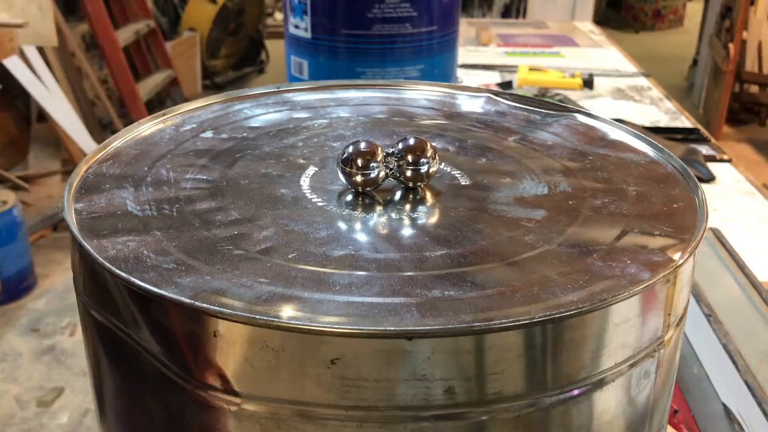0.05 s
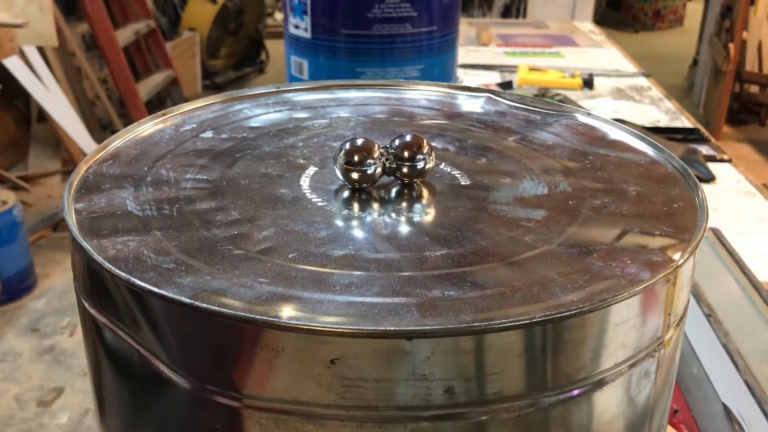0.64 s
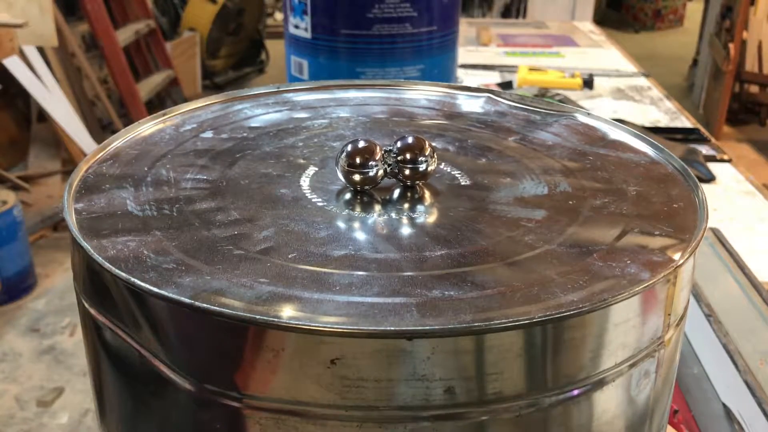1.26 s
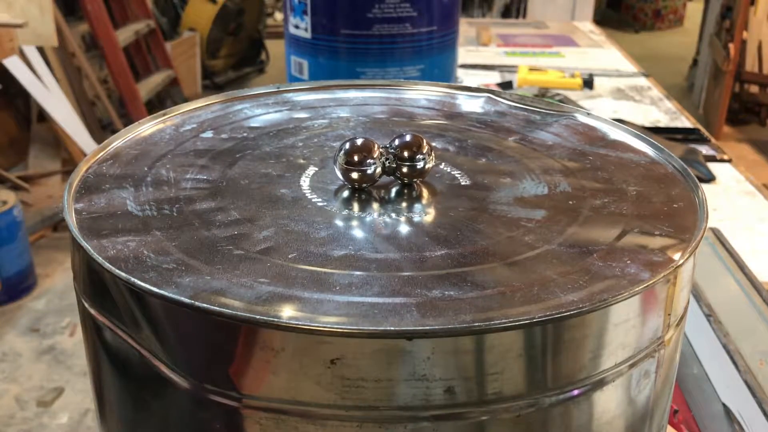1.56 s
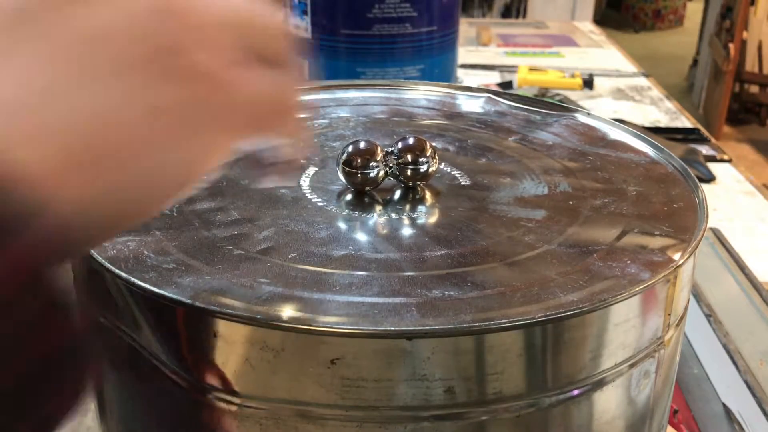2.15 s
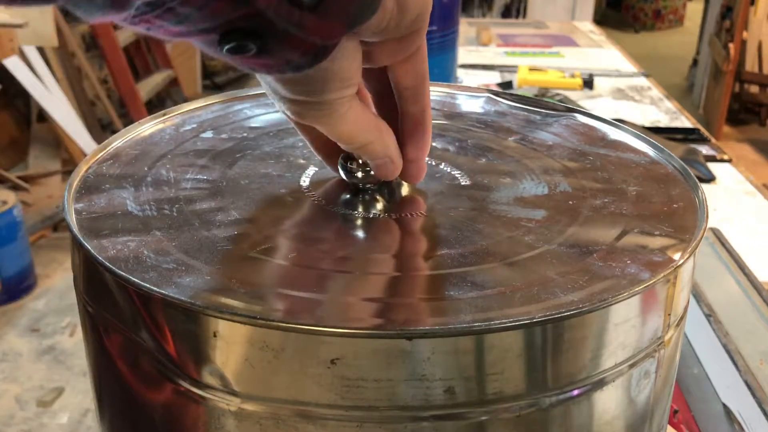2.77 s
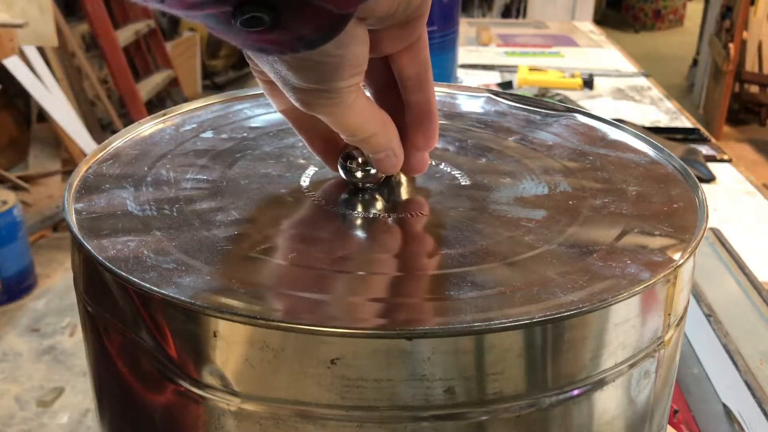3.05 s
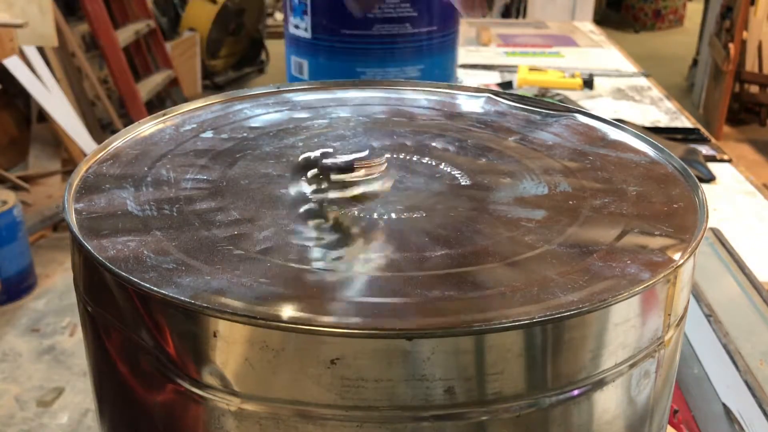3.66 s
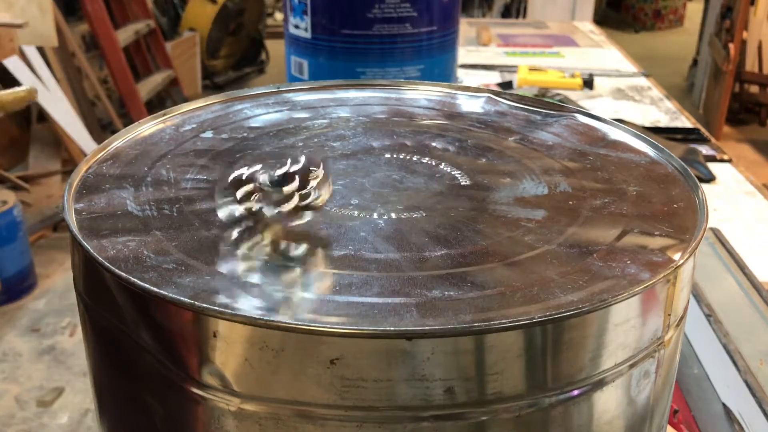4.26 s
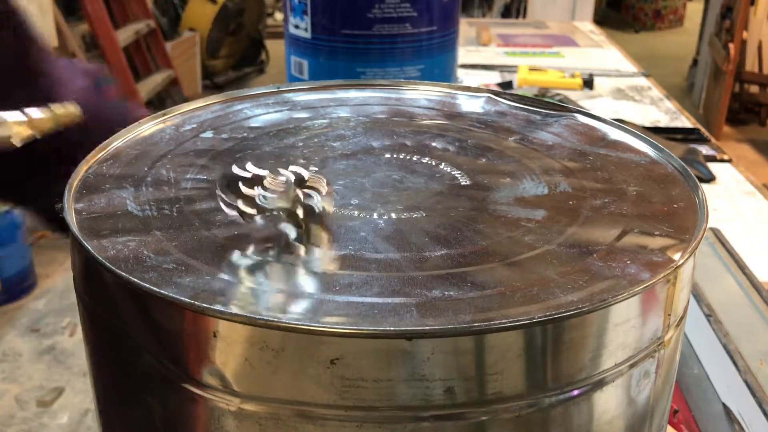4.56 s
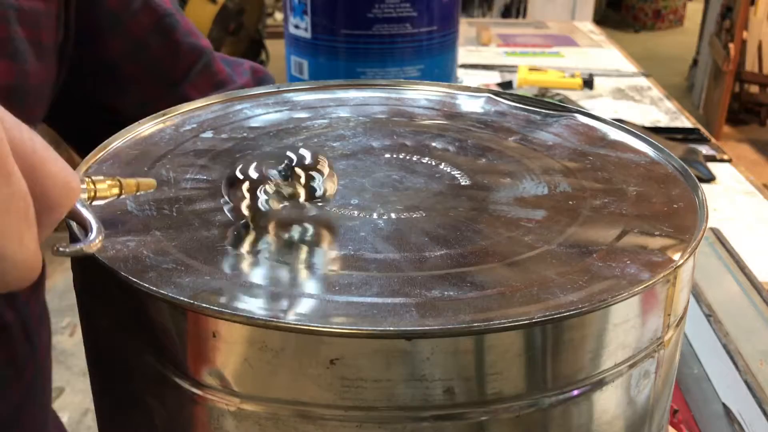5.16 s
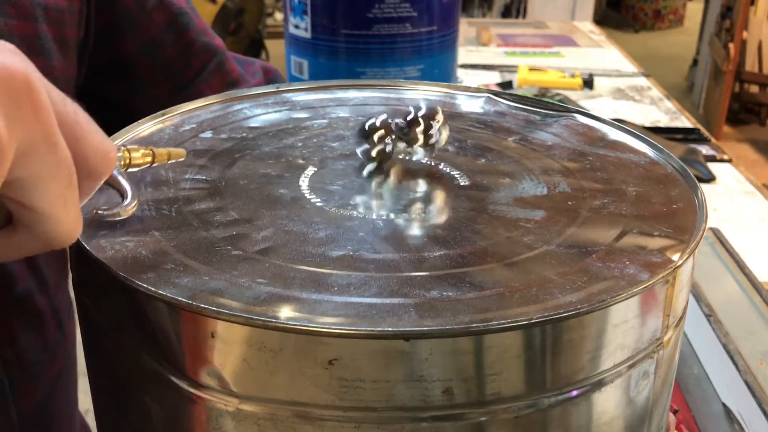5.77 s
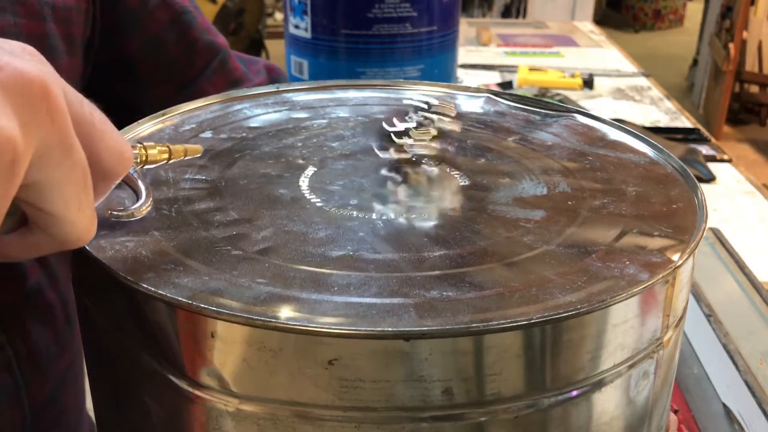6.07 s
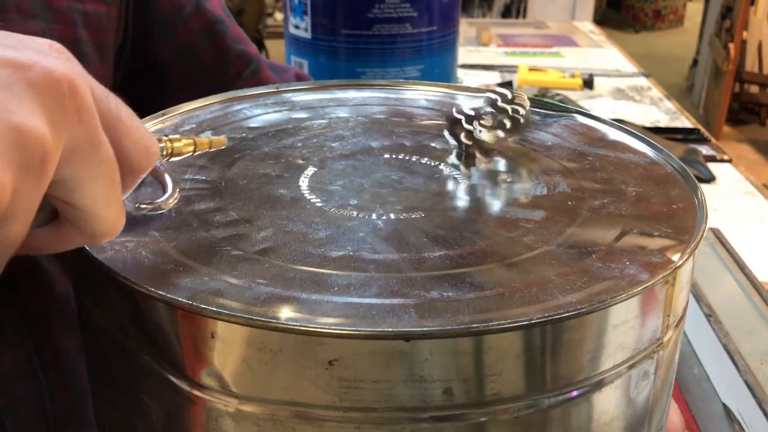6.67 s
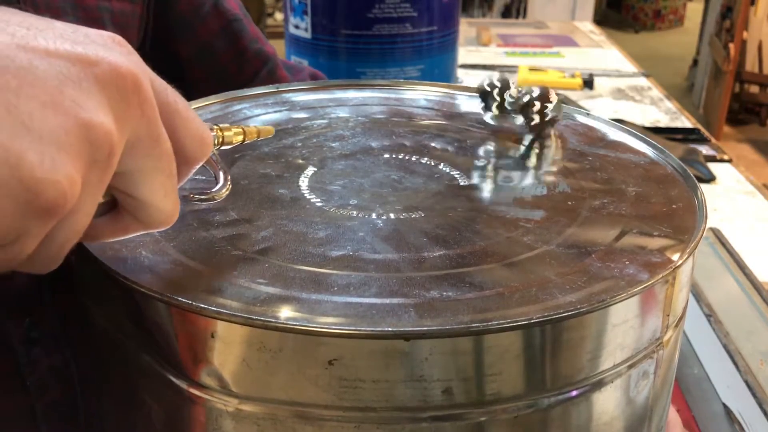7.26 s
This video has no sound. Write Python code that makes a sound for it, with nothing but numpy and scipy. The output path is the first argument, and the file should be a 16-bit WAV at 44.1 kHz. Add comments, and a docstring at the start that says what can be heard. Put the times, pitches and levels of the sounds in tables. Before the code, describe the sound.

For the first two seconds there is only low workshop room noise with a few small clicks, heard from just above a large metal tin. A light knock comes at about 2.1 seconds, then a faint sleeve rustle, a click and soft rubbing as fingers roll two joined steel balls on the lid. At 3.6 seconds the balls are flicked into a spin: a few clacks, a short rising, ringing skid, then a continuous metallic rattle over the lid's hum, swelling in buzzing bursts as they bounce. At 5.1 seconds an air gun opens with a loud roar that sinks in pitch and gives way within half a second to a steady, bright hiss. The balls keep rattling beneath it, with several hard landings between 5.5 and 6.3 seconds. The hiss grows slightly shriller, and both sounds continue until the end at about 7.5 seconds.

```python
"""A workshop, the microphone just above the lid of a large tin. Fingers roll two joined steel ball
bearings into place, then flick them into a spin. Their rolling contact rattles the lid, and they
bounce on it in bursts, with some hard landings. An air gun opens, roars over the balls and drives
them towards the rim, hissing steadily. Behind it all, the tin sings faintly with the room's noise."""
import sys
import numpy as np
from scipy import signal
from scipy.fft import rfft, irfft
from scipy.io import wavfile
from scipy.ndimage import uniform_filter1d

SR = 44100
rng = np.random.default_rng(int(sys.argv[2]) if len(sys.argv) > 2 else 0)


def pcm_store(signal):
    """Save signal as 16-bit PCM."""
    levels = np.round(np.clip(np.atleast_2d(signal), -1, 1) * 32767)
    wavfile.write(sys.argv[1], SR, levels.astype(np.int16).T)


N = 331632
TIME = np.arange(N) / SR
FLICK_S, SHOP_T60_S = 3.648, 0.41


# The balls' path under the microphone. Each row: time in seconds, place from 0 (middle) to 1 (rim).
BALL_PATH = [(3.6, 0.43), (5.2, 0), (5.6, 0.6), (6.3, 0.7), (7.0, 0.75), (7.5, 0.96)]
# The pair skids, settles and spins freely. Each row: time in seconds, rattle in dB, rumble in dB.
FREE_SPIN = [(3.66, -36.5, -22.5), (3.71, -30.5, -22.5), (3.745, -24, -25.5), (3.82, -22, -23),
             (3.97, -31, -28), (4.16, -32.5, -27), (4.28, -29.5, -22.5), (4.49, -32.5, -31.5),
             (4.84, -29.5, -27.5), (5.02, -31.5, -27)]
# The air holds the pair back, then drives it outwards. Each row reads as in the free spin.
DRIVEN_SPIN = [(5.11, -35.5, -33.5), (5.35, -32.5, -31.5), (5.39, -28.5, -22), (5.52, -26, -17),
               (5.77, -28, -22), (6.2, -25, -23), (6.44, -31, -28), (7.06, -31, -27), (7.16, -31, -23),
               (7.5, -33, -26)]
# The lid's low and middle modes from close above. Each row: pitch in Hz, width in Hz, weight in dB
# with the balls near the middle, weight in dB near the rim.
LOW_MODES = [(158.6, 25, -6.5, 8.5), (191.4, 15, 1, -9), (222.6, 19, 3, -4), (243.2, 16.6, 3, 0.5),
             (280.7, 24, -14.5, 3), (301, 8.3, -4.5, -1.5), (328, 13, -16, 1), (346, 7, -7, 1.5),
             (419.6, 14, -17.5, -1.5)]
MID_MODES = [(478, 14, -0.5, -2.5), (535.6, 16.6, 2.5, 4), (553.7, 17, 2.5, -5.5), (583, 16, -6, -21),
             (630, 16, 1, -20), (658, 11, -7, -9), (771.5, 17, -13, -7), (836, 12, 0.5, -6.5),
             (858, 19, 1, -9), (970, 140, -26, -22)]
def spinning_balls():
    """Dense micro-impacts of steel on sheet metal, bunched at each bounce, make the lid rumble and ring."""
    rattle_db, rumble_db = in_time(FREE_SPIN + DRIVEN_SPIN)
    place, = in_time(BALL_PATH)
    swell, phase = bouncing()
    burst = swell / swell.max()
    drum = swell * np.sqrt(2) * np.cos(phase)
    # the contact presses harder once a bounce, the more so in a strong burst
    pressure = np.clip(1 + (0.097 + .5 * burst) * np.cos(phase), 0, None) * from_db(1.23 * drift(60))
    force = rms_one(grains(per_s=6000, spread_db=2.5) * pressure)
    rumble = from_db(rumble_db + 6 * burst) * radiated(lid(force, LOW_MODES, place))
    ring_db = -32 + 1.32 * (rattle_db + 30.5)   # follows the rattle, which is -30.5 dB at an even spin
    ring = from_db(ring_db) * radiated(lid(force, MID_MODES, place))
    contact = rattle(force, rattle_db, burst) + skid()
    hum = from_db(rumble_db) * whirl(place)
    return (drum + rumble + ring + contact + hum) * after(FLICK_S)


def lid(force, modes, place):
    """The lid's modes, weighted by where the balls run and held at an even level."""
    out = sum(from_db(middle_db + (rim_db - middle_db) * place) * resonate(force, hz, width)
              for hz, width, middle_db, rim_db in modes)
    return out / np.sqrt(uniform_filter1d(out ** 2, size=2600).clip(0) + 1e-12)


# Trains of bouncing on the lid. Each row: first and last burst in seconds, number of bursts,
# bounces per second, first level in dB, change per burst in dB.
BOUNCE_TRAINS = [(3.672, 3.735, 2, 118, -27.5, 1.5), (3.835, 4.098, 3, 111, -26, 0.2),
                 (4.289, 4.355, 2, 116, -28, -4), (4.543, 4.637, 2, 112, -26.5, 4.5),
                 (4.732, 5.081, 5, 111, -23, -1.5), (5.408, 5.718, 5, 113, -28, 1.15),
                 (5.823, 6.217, 5, 112, -30.5, 1.56), (6.314, 6.614, 4, 103.4, -21.5, -2.8),
                 (6.72, 7.423, 8, 107, -29.5, -0.8)]
def bouncing(half_length_s=0.023, wander=0.029):
    """Swell and phase of the bounce bursts, evenly spaced in trains that grow or die step by step."""
    bursts = [(at, per_s, first_db + k * step_db)
              for first_s, last_s, count, per_s, first_db, step_db in BOUNCE_TRAINS
              for k, at in enumerate(np.linspace(first_s, last_s, round(count)))]
    swell = swells([(at, half_length_s, db) for at, _, db in bursts])
    rate, _ = in_time(bursts)
    return swell, 2 * np.pi * np.cumsum(rate * (1 + wander * drift(90))) / SR


# High lid modes that stand out of the rattle. Each row: pitch in Hz, width in Hz, relative level in dB.
HIGH_MODES = [(1185, 10, -13), (1424, 44, -17.5), (1660, 26, -18.5), (2106, 20, -18), (2280, 19, -34),
              (2440, 16, -27), (2580, 18, -17), (2770, 13, -18), (3140, 28, -43), (3570, 63, -25)]
# The contact's rattle and sizzle, close up. Each row: frequency in Hz, relative level in dB.
RATTLE_SPECTRUM = [(700, -15), (1000, -6.5), (1400, 1), (2400, -1.5), (3400, -4), (4400, -4.5), (5900, -5),
                   (7200, -16.5), (9500, -51)]
SIZZLE_SPECTRUM = [(5000, -21), (7200, 2), (8800, 4.5), (10500, -3), (12000, 0.5), (15700, -1.5)]
def rattle(force, level_db, burst):
    """The contact shakes the high modes, sizzling more in bursts and while the steel slips at first."""
    sheet = rms_one(force + shimmer(force, decay_s=0.0055) + tail(force, t60=0.2))
    tones = sum(from_db(db) * rms_one(resonate(force, hz, width)) for hz, width, db in HIGH_MODES)
    slip = np.exp(-np.maximum(TIME - FLICK_S, 0) / 0.11)
    sizzle_db = -13 + 8.5 * slip + 3.5 * burst + 4.5 * drift(45)
    sizzle = from_db(sizzle_db) * coloured(sheet, SIZZLE_SPECTRUM)
    return from_db(level_db) * (coloured(sheet, RATTLE_SPECTRUM) + tones + sizzle)


def shimmer(force, decay_s):
    """Each impact leaves a brief wash of overlapping high modes, different at every spot on the lid."""
    r = np.exp(-1 / (decay_s * SR))
    energy = signal.lfilter([1 - r], [1, -r], force ** 2 + 1e-18)
    return rms_one(rng.standard_normal(N) * np.sqrt(energy))


# Steel skidding on the lid. Each row: time in seconds, level in dB, pitch in Hz.
SKID_RING = [(3.64, -120, 332), (3.66, -37, 341), (3.74, -21, 398.6), (3.775, -25, 501), (3.80, -23, 611),
             (3.83, -12.5, 633), (3.88, -29.5, 643), (3.96, -24, 650), (4.05, -120, 645)]
def skid():
    """Just after the flick the balls skid with a rising ring."""
    db, hz = in_time(SKID_RING)
    return from_db(db) * wavering(hz, rate=110)


# The pair's speed on the lid. Each row: time in seconds, turns per second.
SPIN_SPEED = [(3.65, 60), (4.85, 59.3), (5.5, 51), (5.85, 57.4), (6.3, 55.2), (7.5, 53)]
# The spin's third and fourth multiples. Each row: dB against the rumble near the middle, then at the rim.
WHIRL_HUM = [(-10, -2), (-8.5, 1)]
def whirl(place):
    """The whirling pair rocks the lid; multiples of its spin that meet lid modes hum, most at the rim."""
    turns_per_s, = in_time(SPIN_SPEED)
    angle = 2 * np.pi * np.cumsum(turns_per_s * (1 + 0.01484 * drift(30))) / SR
    hum = np.zeros(N)
    for multiple, (middle_db, rim_db) in zip((3, 4), WHIRL_HUM):
        db = middle_db + (rim_db - middle_db) * place ** 2.76 + 1.94 * drift(25)
        hum += from_db(db) * np.sin(multiple * angle)
    return np.sqrt(2) * hum


# Hard landings right under the microphone. Each row: start in seconds, relative strength in dB.
LANDINGS = [(3.657, -6.5), (3.738, -7), (3.824, -10), (4.276, -17), (4.825, -16.5), (5.480, -8),
            (5.533, -2.5), (5.606, -11), (5.630, -11), (5.668, -20), (5.820, -16.5), (5.890, -4),
            (6.071, -4), (6.103, -18), (6.161, -1), (6.203, -9), (6.336, -16)]
def landings():
    """A ball drops hard: the lid thumps in its modes, damped by the ball, with a short clack on top."""
    hits = clicks(LANDINGS)
    thump = sum(from_db(rim_db) * resonate(hits, hz, 1.6 * width)
                for hz, width, _, rim_db in LOW_MODES + MID_MODES)
    clack = band(tail(hits, t60=0.071), 700, 8800)
    return from_db(23) * radiated(thump) + from_db(10) * clack


# The jet, close by; its shrill band grows as the nozzle turns towards the microphone.
# Each row: time in seconds, hiss in dB, shrill band in dB.
JET_LEVELS = [(5.1, -26, -60), (5.15, -24.5, -33), (5.18, -16, -26), (5.31, -13, -31), (5.42, -16, -30),
              (5.8, -16.5, -34), (6.4, -16.5, -27.5), (6.9, -15, -26.5), (7.52, -16, -21.5)]
# The nozzle's hiss. Each row: frequency in Hz, relative level in dB.
HISS_SPECTRUM = [(400, -8), (1200, -5.5), (2600, -8.5), (3300, -9), (4000, -3.5), (6300, -2), (8800, -2),
                 (10200, -3.5), (11600, -4), (13000, -6.5), (14400, 1), (15600, 1)]
# The half-open valve's resonances. Each row: pitch in Hz, width in Hz.
VALVE_MODES = [(10900, 1050), (14200, 490), (14900, 610)]
def air_gun(opens_s=5.097, hold_s=0.09, fade_db_per_s=600):
    """The valve cracks open with a brief sizzle, the nozzle hisses and the stream roars."""
    hiss_db, shrill_db = in_time(JET_LEVELS)
    hiss = from_db(hiss_db + .5 * drift(50)) * coloured(rng.standard_normal(N), HISS_SPECTRUM)
    shrill = from_db(shrill_db) * rms_one(band(rng.standard_normal(N), 11000, 14200, order=4))
    valve_db = -33 - fade_db_per_s * np.maximum(TIME - opens_s - hold_s, 0)
    leak = sum(resonate(resonate(rng.standard_normal(N), hz, width), hz, 2 * width)
               for hz, width in VALVE_MODES)
    return (hiss + shrill + from_db(valve_db) * rms_one(leak) + air_roar()) * after(opens_s)


# The stream breaking over the balls, below the microphone. Each row: time in seconds, level in dB.
ROAR_LEVELS = [(5.13, -48), (5.18, -15), (5.3, -12.5), (5.44, -17), (5.55, -24), (5.72, -38), (6.2, -37),
               (6.45, -36), (7.52, -28)]
def air_roar(near_hz=2500, far_hz=1100, blown_away_s=5.33, sink_s=0.17):
    """Eddies roar, sinking in pitch as the balls are blown away; spilled air buffets the microphone."""
    roar_db, = in_time(ROAR_LEVELS)
    centre_hz = far_hz + (near_hz - far_hz) * np.exp(-np.maximum(TIME - blown_away_s, 0) / sink_s)
    eddies = rng.standard_normal(N)
    eddies += from_db(-14.5) * tail(eddies, t60=0.11)   # the lid throws the roar back
    edges_hz = np.geomspace(400, 14000, num=13)
    roar, power = 0, 0
    for low, high in zip(edges_hz, edges_hz[1:]):
        octaves = np.log2(np.sqrt(low * high) / centre_hz)
        slope_db = np.minimum(16 * (octaves + 0.43), -2.7 * np.maximum(octaves, 0))
        gain = from_db(slope_db + 2.4 * drift(70))
        roar += gain * rms_one(band(eddies, low, high, order=3))
        power += gain ** 2
    draught = from_db(0.42 * roar_db - 40) * rms_one(band(rng.standard_normal(N), 25, 100))
    return from_db(roar_db) * rms_one(roar / np.sqrt(power)) + draught


# Passes of the hand near the microphone. Each row: peak in seconds, half length in seconds, level in dB.
BRUSHES = [(.25, 0.12, -68.5), (.52, .09, -68.5), (2.3, 0.12, -61), (2.53, 0.052, -59.5),
           (2.71, 0.043, -53), (2.8, 0.075, -64), (3.65, .014, -41.5)]
# The cloth's rustle. Each row: frequency in Hz, relative level in dB.
SLEEVE_SPECTRUM = [(200, 5), (700, 3), (1500, -1.5), (3500, -8), (6000, -11.5), (10000, -16), (15500, -18)]
def sleeve():
    """Sleeve and fingers brush past, the last time in the flick."""
    return swells(BRUSHES) * coloured(grains(per_s=4300, spread_db=0.5), SLEEVE_SPECTRUM)


# The pressed lid and the fingertips, faint even this close.
# Each row: time in seconds, level in dB, pitch in Hz.
PRESSED_LID = [(2.44, -90, 255), (2.48, -59, 263), (2.51, -49, 264), (2.6, -53, 279), (2.67, -51, 303.5),
               (2.73, -49, 310), (2.79, -53, 293), (2.86, -60, 285), (2.95, -90, 280)]
FINGER_SQUEAK = [(2.48, -90, 1450), (2.52, -67, 1524), (2.6, -65.5, 1495), (2.66, -65, 1760),
                 (2.72, -70, 1640), (2.8, -90, 1605)]
def rubbing():
    """The pressed lid hums under the slowly rolled balls, and fingertips squeak on the steel."""
    lid_db, lid_hz = in_time(PRESSED_LID)
    squeak_db, squeak_hz = in_time(FINGER_SQUEAK)
    hum = from_db(lid_db) * wavering(lid_hz, rate=95)
    return hum + from_db(squeak_db) * wavering(squeak_hz, rate=240)


# Handling at the tin. Each row: start in seconds, peak in dB, lowest and highest frequency in Hz,
# room tail in dB against the tap.
TAPS = [(.189, -50, 200, 900, -8), (.218, -51, 1800, 5000, 3), (.270, -56, 1500, 5000, -4),
        (.303, -46, 7000, 15000, -3), (.524, -36.5, 2500, 15000, -3), (.549, -48, 1510, 6100, -4),
        (2.148, -33, 240, 1450, 2.5), (2.162, -47, 300, 1600, -10), (2.685, -33, 1600, 7000, -16)]
def taps():
    """Small knocks and clicks, each with its echo in the workshop."""
    direct, to_room = np.zeros((2, N))
    for s, db, low_hz, high_hz, tail_db in TAPS:
        tap = band(clicks([(s, 0)]), low_hz, high_hz, order=4)
        tap *= from_db(db) / np.abs(tap).max()
        direct += tap
        to_room += from_db(tail_db) * tap
    return direct + tail(to_room, SHOP_T60_S)


# The workshop all around. Each row: frequency in Hz, relative level in dB.
ROOM_SPECTRUM = [(20, -22), (45, -0.5), (70, 2.5), (105, 2.5), (150, -5), (200, -3.5), (260, -9),
                 (360, -10.5), (480, -13.5), (650, -24), (850, -21), (2000, -29), (4000, -34),
                 (15500, -37.5)]
# The tin's own hum from just above. Each row: pitch in Hz, width in Hz, level in dB.
TIN_HUM = [(244.4, 8.4, -66.5), (360, 24, -76.5), (640, 28, -74.5)]
def room_tone():
    """The room's steady noise, with the tin singing faintly along."""
    room = from_db(-57.5) * coloured(rng.standard_normal(N), ROOM_SPECTRUM)
    return room + sum(from_db(db) * rms_one(resonate(rng.standard_normal(N), hz, width))
                      for hz, width, db in TIN_HUM)


def from_db(db):
    """Decibels to gain."""
    return 10 ** (np.asarray(db) / 20)


def rms_one(x):
    """Scale to rms 1."""
    return x / np.sqrt(np.mean(x ** 2) + 1e-20)


def in_time(rows):
    """Each column of a curve at every sample."""
    s, *columns = np.transpose(rows)
    return [np.interp(TIME, s, c) for c in columns]


def after(start_s):
    """A gain that opens within 5 ms."""
    return np.clip((TIME - start_s) * 200, 0, 1)


def swells(rows):
    """Smooth rises and falls, one for each (s, half length s, dB), as a gain."""
    t = TIME[::40]
    power = sum(from_db(db) ** 2 * np.exp(-((t - at) / half_s) ** 2) for at, half_s, db in rows)
    return np.interp(TIME, t, np.sqrt(power + 1e-18))


def drift(rate):
    """A random wander through `rate` values a second, each of spread 1."""
    knots = rng.standard_normal(8000)
    return np.interp(TIME * rate, np.arange(len(knots)), knots)


def wavering(hz, rate):
    """A rubbed tone whose strength and phase wander `rate` times a second."""
    phase = 2 * np.pi * np.cumsum(hz) / SR
    return drift(rate) * np.cos(phase) + drift(rate) * np.sin(phase)


def clicks(rows):
    """One click for each (s, dB)."""
    out = np.zeros(N)
    for s, db in rows:
        out[round(s * SR)] += from_db(db)
    return out


def grains(per_s, spread_db):
    """Random tiny impacts of uneven size; rms 1."""
    sizes = from_db(spread_db * np.minimum(rng.exponential(1, N), 4)) * rng.choice([-1, 1], N)
    return rms_one(sizes * (rng.random(N) < per_s / SR))


def coloured(x, spectrum):
    """Give a steady sound a spectrum; rms 1."""
    hz, db = np.transpose(spectrum)
    bins = np.fft.rfftfreq(N, 1 / SR) + 1
    low_cut = np.minimum(bins / hz[0], 1) ** 2
    gain = from_db(np.interp(np.log(bins), np.log(hz), db))
    return rms_one(irfft(rfft(x) * low_cut * gain, N))


def band(x, low_hz, high_hz, order=2):
    """Causal band-pass."""
    sos = signal.butter(order, [low_hz, min(high_hz, SR / 2 - 1000)], "band", fs=SR, output="sos")
    return signal.sosfilt(sos, x + 1e-18)


def resonate(x, hz, width_hz):
    """One resonance with gain 1 at its peak."""
    r = np.exp(-np.pi * width_hz / SR)
    feedback = [1, -2 * r * np.cos(2 * np.pi * hz / SR), r * r]
    return signal.lfilter(np.array([1, 0, -1]) * (1 - r * r) / 2, feedback, x + 1e-18)


def radiated(x, lowest_hz=105):
    """The lid gives off next to nothing below its lowest mode."""
    return signal.sosfilt(signal.butter(4, lowest_hz, "high", fs=SR, output="sos"), x)


def tail(x, t60):
    """Countless overlapping modes or echoes: a dying noise as response, at unit energy."""
    t = TIME[:SR // 2]
    response = rng.standard_normal(len(t)) * from_db(-60 * t / t60)
    return signal.fftconvolve(x, response / np.linalg.norm(response))[:N]


def scene():
    """Everything is heard from one spot just above the tin, the same in both ears."""
    near = spinning_balls() + landings() + air_gun()
    echo = from_db(-15.5) * tail(band(near, 330, 11000, order=1), SHOP_T60_S)
    return np.tile(near + echo + room_tone() + sleeve() + rubbing() + taps(), (2, 1))


# Narrow dips in the microphone's treble. Each row: frequency in Hz, width in Hz, depth from 0 to 1.
MIC_DIPS = [(4950, 240, 0.46), (7700, 260, 0.49), (10350, 650, 0.3)]
def record(dry, cutoff_hz=15800):
    """The microphone opens, colours the treble and rounds the peaks; the top is cut."""
    out = dry * after(0.11)
    for hz, width, depth in MIC_DIPS:
        out = out - depth * resonate(out, hz, width)
    out = 1.613 * np.tanh(out / 1.586)
    return signal.sosfilt(signal.ellip(12, .1, 80, cutoff_hz, fs=SR, output="sos"), out)


dry = scene()
out = record(dry)
pcm_store(out)
```